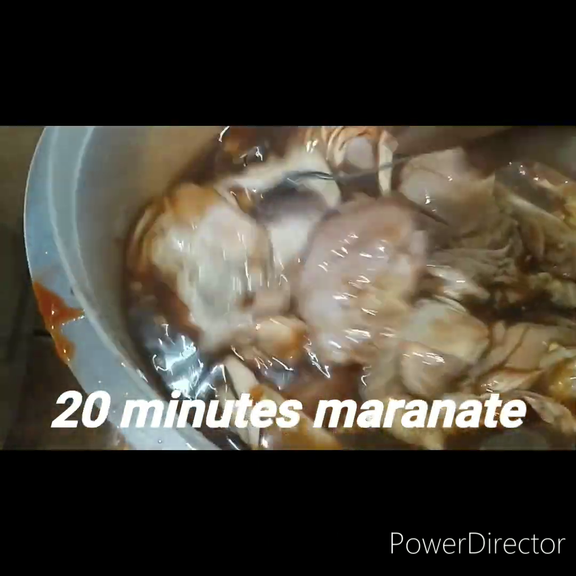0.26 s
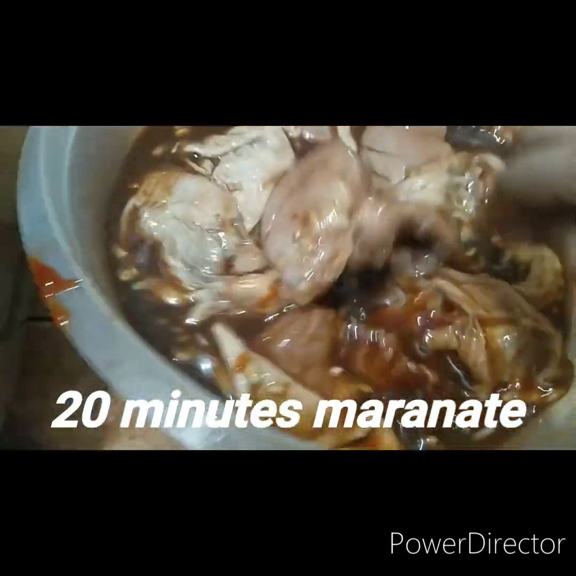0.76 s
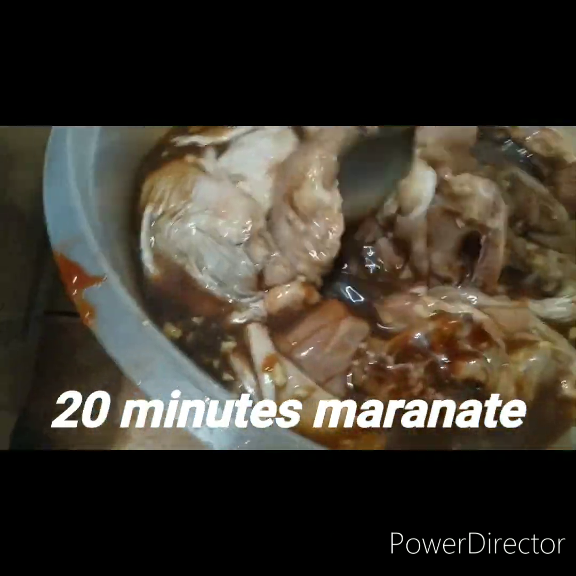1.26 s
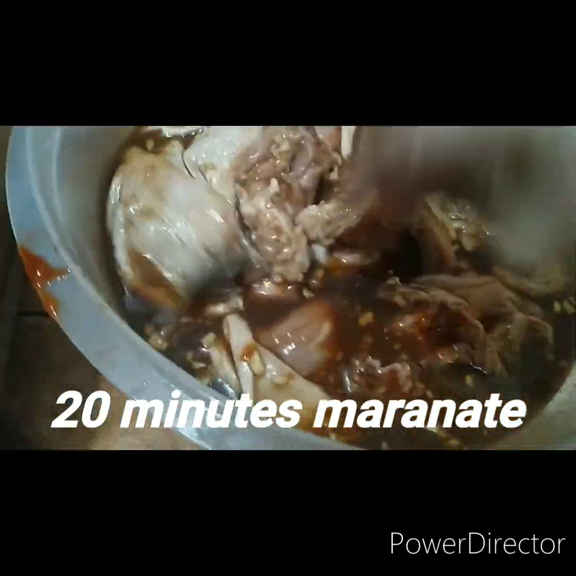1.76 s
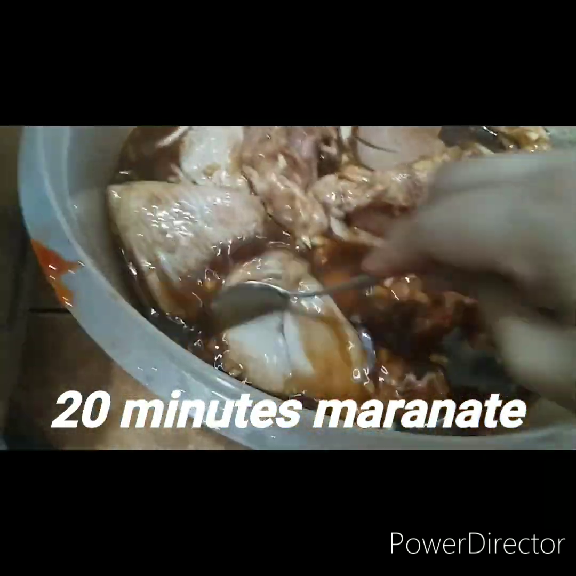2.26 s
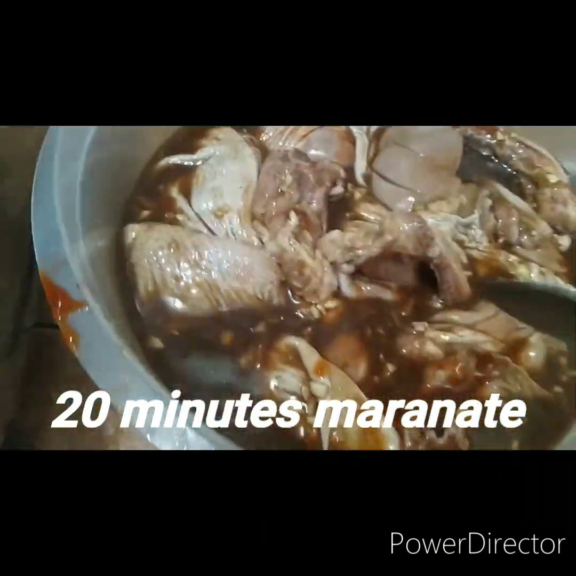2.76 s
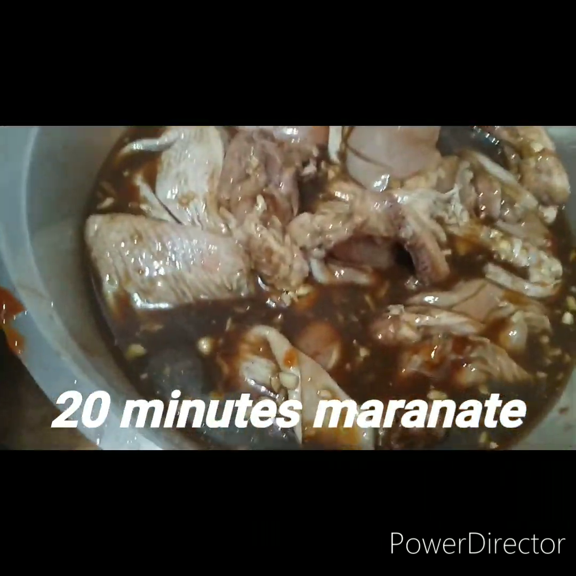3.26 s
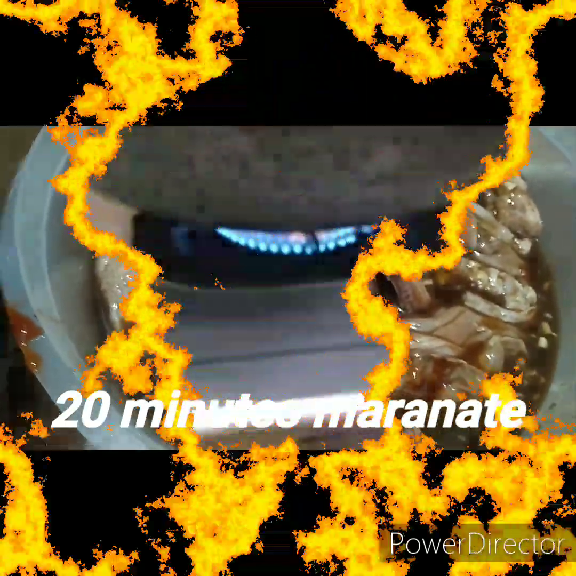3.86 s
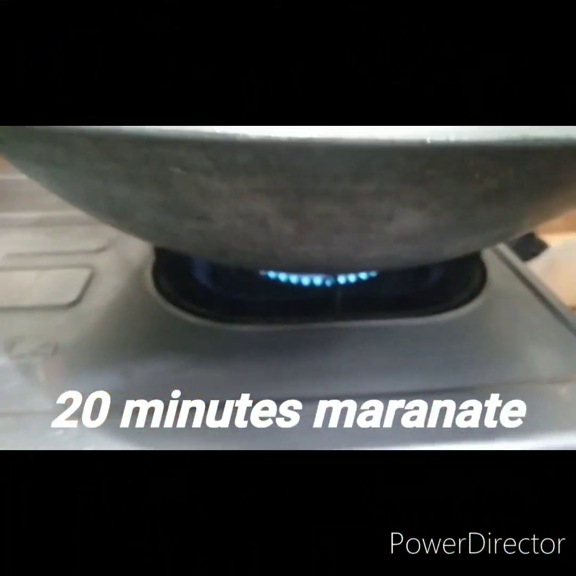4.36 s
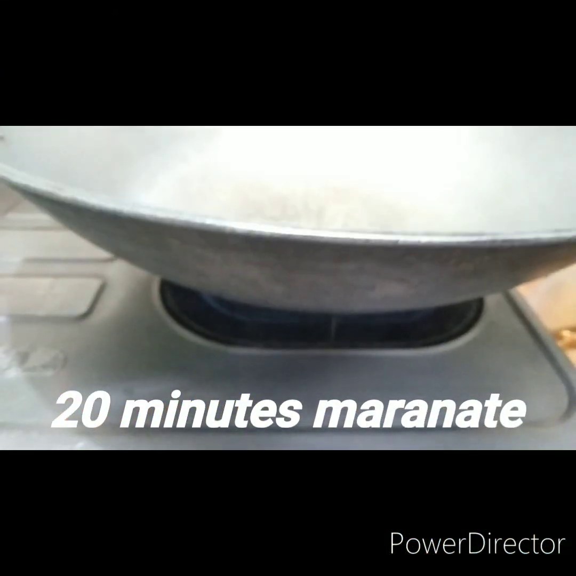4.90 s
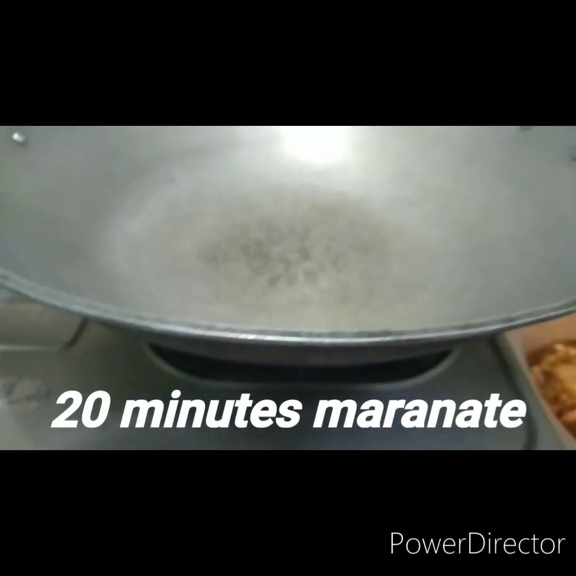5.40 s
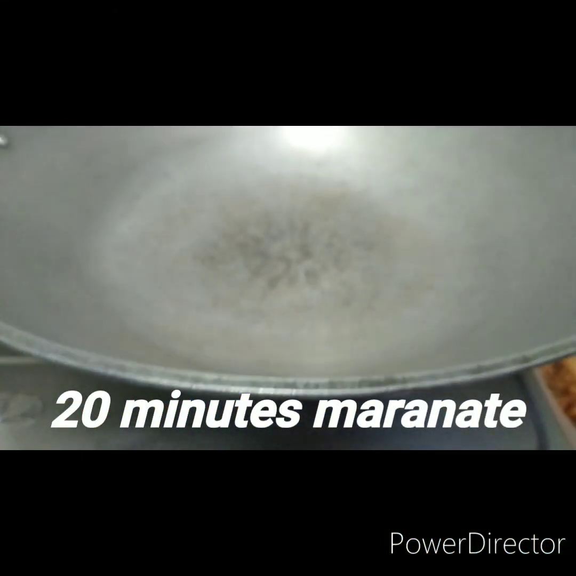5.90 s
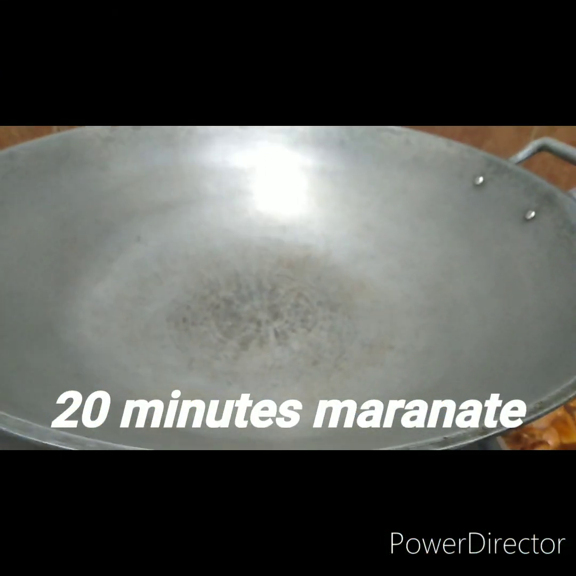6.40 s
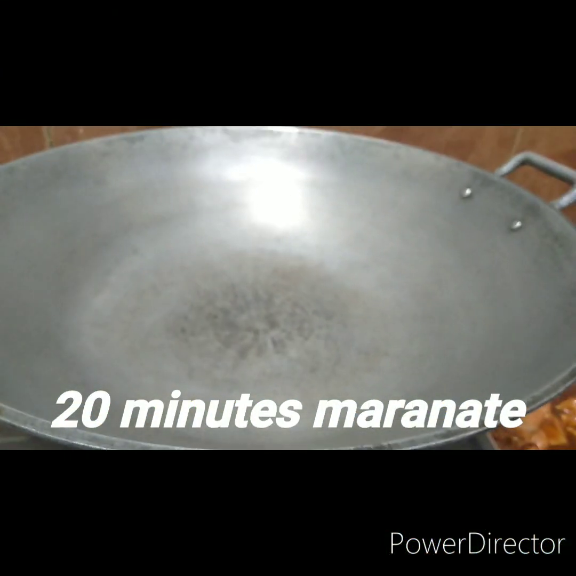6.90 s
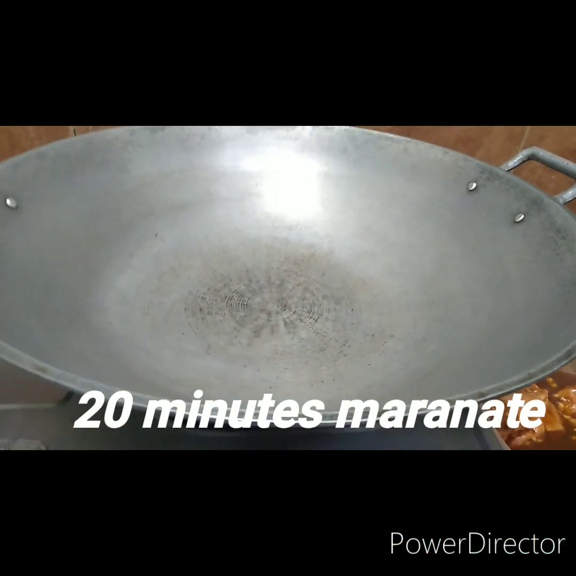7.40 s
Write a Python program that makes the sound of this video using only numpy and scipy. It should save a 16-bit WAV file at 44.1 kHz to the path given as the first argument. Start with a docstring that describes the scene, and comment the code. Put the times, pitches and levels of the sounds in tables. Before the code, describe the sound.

In a faintly humming kitchen, a spoon turns chicken in marinade with a soft wet swish, sticky ticks and thin squeaks, then knocks several times on the plastic bowl. A finger brushes the microphone with a loud, high scratch. After a brief silence, a gas burner fades in with a deep thump and a quiet, steady rush. The stove clunks and an empty wok pings twice.

```python
"""A soft, wet swish: a spoon turns chicken in marinade, with sticky ticks and thin squeaks, in a humming
kitchen. It knocks on the plastic bowl, whose wall rings briefly over a thud from the base. A finger then
brushes the microphone, its friction ringing the port and casing. After a short silence a gas burner
fades in with a deep thump under an empty wok; the stove is bumped and the metal pings twice."""
import sys
import numpy as np
from scipy import signal
from scipy.fft import rfft, irfft, next_fast_len
from scipy.io import wavfile

SR = 44100
rng = np.random.default_rng(int(sys.argv[2]) if len(sys.argv) > 2 else 0)


def persist_wave(psi):
    """Save psi, clipped to +-1, as 16-bit WAV."""
    counts = np.round(np.clip(psi, -1, 1) * 32767).astype(np.int16)
    wavfile.write(sys.argv[1], SR, np.atleast_2d(counts).T)


N = 337365
TIME = np.arange(N) / SR
AGE = TIME[:SR // 2]   # seconds since a hit

# spoon hits, before each layer's trim: t/s, ring level/dB, thud level/dB, crack level/dB, ring centre f/Hz
SPOON_KNOCKS = [(2.196, -20, -46, -32.5, 2110), (2.442, -20, -54, -42, 1750), (2.8, -19, -29, -32, 1160),
                (2.895, -18.5, -31, -42.5, 2090), (2.994, -32, -42.5, -44, 1230)]
# modes of the bowl's wall and of its loaded base: f/Hz, level/dB, t60/s
WALL_MODES = [(506, -13, 0.027), (630, -1.5, 0.017), (792, -2, 0.031), (1010, -8, 0.02), (1175, -7, 0.011),
              (1194, 0.5, 0.031), (1335, 0.5, 0.022), (1600, -4.5, 0.018), (1770, 0.5, 0.021),
              (2060, -1.5, 0.033), (2410, 2, 0.0072), (2464, 0.5, 0.015), (2904, -7, 0.022),
              (3640, -6, 0.019)]
BASE_MODES = [(140, -10, 0.079), (207, -5, 0.054), (344, -2.5, 0.047), (468, 0, 0.027)]
SETTLE_MODES = [(163.7, 0, 0.26), (195.5, 0, 0.16)]
# meat slaps and spoon slips, then meat settling on the base: t/s, level/dB
MEAT_SLAPS = [(.856, -41.5), (2.211, -38), (2.931, -37), (2.944, -34.5), (2.953, -36), (3.323, -43)]
MEAT_SETTLES = [(1.85, -50), (1.888, -49), (2.04, -51.5)]
# stirring effort: t/s, relative level/dB
STIR_EFFORT = [(0.0, -49.5), (0.52, -62), (0.88, -49), (1.44, -60), (1.99, -48), (2.15, -57)]
# colour of the spoon's crack and of the swish: f/Hz, density/dB
CRACK_SPECTRUM = [(600, -5), (2000, 5), (4000, -3.5), (6000, -1), (8500, -6.5), (10000, 2.5), (11000, 9.5),
                  (12500, -2), (15500, -12)]
SWISH_SPECTRUM = [(300, -19), (600, -1), (1100, -1), (2400, -5.5), (5000, -29), (12000, -42)]
# sticky marinade ticks: t/s, level/dB, f/Hz
SAUCE_TICKS = [(0.243, -52, 9600), (0.2768, -55, 11600), (0.4853, -54, 10300), (0.6898, -50, 12300),
               (1.1613, -49, 10500), (1.3992, -54, 13000), (1.5374, -56, 8500)]
# wet spoon squeaks: t/s, length/s, f/Hz, level/dB
SPOON_SQUEAKS = [(0.437, 0.52, 9850, -57.5), (1.89, .32, 4500, -66)]

# finger strokes: t/s, force level/dB, contact length/s, favoured f/Hz, relative hiss level/dB
FINGER_STROKES = [(3.203, -19.5, .005, 12300, -24), (3.346, -12.5, 0.0035, 10200, -22),
                  (3.366, -19.5, 0.041, 11000, -19), (3.665, -33, .003, 9500, -16),
                  (3.679, -23.5, 0.044, 11100, -12.5), (3.746, -32, 0.0045, 9000, -22)]
# rings of the microphone's port and casing: f/Hz, width/Hz, level/dB
PORT_RINGS = [(5100, 44, -10), (8060, 40, -9.5), (9070, 54, -7.5), (9900, 70, -11), (10190, 60, -3),
              (10740, 77, -4.5), (11095, 93, -2.5), (12200, 70, -11), (12500, 73, -6.5), (13850, 65, -16),
              (14800, 80, -15)]
CASING_RINGS = [(1740, 60, -19), (2750, 90, -22), (3780, 52, -21)]
# the finger lands and skips: t/s, level/dB
FINGER_TAPS = [(3.204, -24.5), (3.346, -29), (3.3625, -17.5)]
# presses on the port: t/s
PORT_PRESSES = [3.202, 3.347]
# handling rustles: middle t/s, level/dB, length/s
GRIP_SHIFTS = [(3.593, -49, 0.35), (4.895, -46, 0.044)]
# colour of skin friction, its fine hiss, the taps and the rustles: f/Hz, density/dB
SKIN_SPECTRUM = [(150, -19), (320, -26.5), (550, -11.5), (1600, -3), (2400, -6), (3700, -8.5), (4500, -15),
                 (5400, -12.5), (6600, -19), (8200, -12), (9600, -1), (10800, 6.5), (11700, -6.5),
                 (15400, -9)]
HISS_SPECTRUM = [(11000, -27), (13000, -8), (14300, 2), (15500, -9), (17000, -34.5)]
TAP_SPECTRUM = [(60, -6), (150, 1), (2200, -4.5), (5000, -8), (15000, 0.5)]
RUSTLE_SPECTRUM = [(300, -18), (900, 5), (1500, 2), (3200, -0.5), (6000, -15), (15000, -15)]

# bumps on the stove: t/s, level/dB
STOVE_BUMPS = [(4.528, -33.5), (4.5325, -32), (4.621, -41)]
# wok pings: t/s, level/dB, centre f/Hz, spread/octaves
WOK_PINGS = [(5.3897, -35.5, 3860, 0.39), (5.6922, -25, 2300, 1.8)]
# modes of the stove and the wok: f/Hz, level/dB, t60/s
STOVE_MODES = [(712, 0, 0.044), (776, -1.5, 0.042), (903, 2.5, 0.025), (956, -5.5, 0.052),
               (3300, -9, 0.017)]
WOK_MODES = [(1980, -4, 0.12), (2200, -8, .08), (2125, 0.5, 0.076), (2420, -0.5, 0.16), (2286, 4, 0.079),
             (2453, -1, .09), (2500, -16, .09), (2820, -2, 0.04), (3276, 0.5, 0.078), (3630, -8, 0.12),
             (4692, -7, 0.1), (4970, -15, 0.082), (5590, 0, 0.076), (6860, 1, .06), (6870, 0, 0.066),
             (7600, -18, .08)]
# colour of a ping's noisy edge: f/Hz, density/dB
PING_SPECTRUM = [(1500, 1), (2600, 11), (6000, -2), (9500, -10.0), (13500, 2), (15500, -3.0)]

# burner and room tone, below and above 600 Hz: f/Hz, density/dB
BURNER_LOWS = [(20, -78.5), (65, -88), (92, -73.5), (108, -82), (135, -73.5), (185, -74), (240, -71),
               (300, -71), (380, -79.5), (500, -81.5)]
BURNER_HIGHS = [(700, -80.5), (1500, -80), (2400, -83.5), (3500, -89), (5000, -97), (8000, -104),
                (10000, -102.5), (11300, -99), (12500, -92.5), (13400, -97.5), (13650, -91), (14000, -100),
                (15500, -105)]
ROOM_LOWS = [(20, -74.5), (45, -83.5), (62, -87), (100, -82), (140, -75), (180, -78), (215, -91.5),
             (290, -92), (400, -85.5), (520, -80)]
ROOM_HIGHS = [(750, -81.5), (980, -76.5), (1200, -80.5), (2300, -82.5), (3200, -90), (4500, -95.5),
              (7000, -101), (8800, -100), (10000, -93.5), (11000, -89.5), (12200, -95.5), (14000, -101),
              (15500, -102)]
# motor hum behind the bowl and behind the stove: f/Hz, rms level/dB
HUM_AT_BOWL = [(37.7, -58.5), (75.4, -61.5), (145.3, -62)]
HUM_AT_STOVE = [(45, -58.5), (89, -61), (239, -60), (292, -56)]


def bowl_hits():
    """A spoon knock layers wall ring, base thud and contact crack; the meat lands more softly."""
    out, crack = np.zeros(N), noise(CRACK_SPECTRUM)
    for s, ring_db, thud_db, crack_db, centre_hz in SPOON_KNOCKS:
        add(out, s, ring_db - 5, struck(WALL_MODES, uneven_db=1.5, centre_hz=centre_hz, octaves=0.94))
        add(out, s + 0.00091, thud_db - 0.5, struck(BASE_MODES, uneven_db=0.5))
        add(out, s, crack_db + 6, burst(crack, s, t60=0.022))
    for s, db in MEAT_SLAPS:
        add(out, s, db, struck(WALL_MODES, uneven_db=2.5, centre_hz=1400, octaves=0.38))
    for s, db in MEAT_SETTLES:   # soft and heavy: only the lowest modes swell up
        add(out, s, db, struck(SETTLE_MODES, uneven_db=3.0) * (1 - decay(0.015)))
    return kitchen_reverb(out, wet_db=-7.5, dull_hz=8050)


def stirring():
    """Meat dragged through sauce gives a grainy swish that follows the effort."""
    times, db = np.transpose(STIR_EFFORT)
    effort = np.interp(TIME, times, from_db(db), right=0)
    grain = from_db(3.6 * drift(120))
    return from_db(-3.5) * effort * grain * unit_rms(noise(SWISH_SPECTRUM))


def marinade(tick_width_hz=1900, wander_hz=69.7):
    """Films of sauce snap, each at its own pitch; the wet spoon squeaks in a narrow, wavering band."""
    out, snap = np.zeros(N), rng.standard_normal(N)
    for s, db, hz in SAUCE_TICKS:
        film = resonate(burst(snap, s, t60=0.018), hz, tick_width_hz)
        add(out, s, db, resonate(film, hz, tick_width_hz))
    for s, length, hz, db in SPOON_SQUEAKS:
        phase = 2 * np.pi * np.cumsum(hz + wander_hz * drift(14)) / SR
        envelope = from_db(db) * swell(s, length, edge_s=0.11)
        out += envelope * (drift(400) * np.sin(phase) + drift(400) * np.cos(phase))
    return out


def finger(rise_share=0.46, release_t60_s=0.16):
    """Skin taps, sticks and slips on the microphone; the grainy friction rings its port and casing."""
    out = np.zeros(N)
    rub, grain = unit_rms(noise(SKIN_SPECTRUM)), unit_rms(from_db(1.3 * drift(500)))
    hiss = unit_rms(noise(HISS_SPECTRUM))
    for s, db, length, favoured_hz, hiss_db in FINGER_STROKES:
        span = slice(int(s * SR), int(s * SR) + len(AGE))
        attack = np.clip(AGE / (rise_share * length), 0, 1)
        release_db = -60 * np.maximum(AGE - length, 0) / release_t60_s
        force = grain[span] * attack * from_db(db + release_db)
        slips = force * rng.standard_normal(len(AGE))
        # the place of the finger decides which rings speak most
        port = sum(from_db(ring_db - min(abs(hz - favoured_hz) / 100, 7)) * resonate(slips, hz, width)
                   for hz, width, ring_db in PORT_RINGS)
        casing = sum(from_db(ring_db) * resonate(slips, hz, width) for hz, width, ring_db in CASING_RINGS)
        friction = force * (from_db(-3.5) * rub[span] + from_db(hiss_db) * hiss[span])
        out[span] += friction + from_db(-4) * port + casing
    tap = noise(TAP_SPECTRUM)
    for s, db in FINGER_TAPS:
        add(out, s, db, burst(tap, s, t60=0.018))
    return out


def port_pops(rebound_share=0.48):
    """Each press on the port pulls the pressure down; it rebounds, weaker and longer."""
    return from_db(-24.5) * sum(rebound_share * puff(s + 0.034, length_s=0.11) - puff(s, length_s=0.047)
                                for s in PORT_PRESSES)


def stove_and_wok():
    """The bumped stove clunks with a soft attack; the wok's metal pings with a bright, noisy edge."""
    out, edge = np.zeros(N), noise(PING_SPECTRUM)
    for s, db in STOVE_BUMPS:
        add(out, s, db, struck(STOVE_MODES, uneven_db=1.0) * (1 - decay(0.004)))
    for s, db, centre_hz, octaves in WOK_PINGS:
        add(out, s, db, struck(WOK_MODES, uneven_db=1.5, centre_hz=centre_hz, octaves=octaves))
        add(out, s, db - 7, burst(edge, s, t60=0.15))
    return kitchen_reverb(out, wet_db=-6.0, dull_hz=9000)


def deep_thump():
    """One slow push of air as the burner fades in."""
    return from_db(-31.7) * puff(4.035, length_s=0.26)


def rustles():
    """Short grainy swells as the hand shifts its grip."""
    grip = sum(from_db(db) * swell(s - length / 2, length, length / 2) for s, db, length in GRIP_SHIFTS)
    grain = from_db(3.3 * drift(300))
    return grip * grain * unit_rms(noise(RUSTLE_SPECTRUM))


def burner():
    """The gas flame is a steady rush with a slight flutter."""
    return noise(BURNER_LOWS + BURNER_HIGHS) * from_db(-0.39 + 0.5 * drift(25))


def room_tone():
    """A faint, gently wavering bed of kitchen air."""
    return noise(ROOM_LOWS + ROOM_HIGHS) * from_db(-1.36 + 0.5 * drift(9.16))


def motor_hum(partials, waver_rad):
    """Low motor tones that waver in phase."""
    return sum(from_db(db) * np.sqrt(2) * np.sin(2 * np.pi * hz * TIME + waver_rad * drift(7))
               for hz, db in partials)


def kitchen_reverb(x, wet_db, dull_hz, t60=0.15):
    """Direct sound and a short, duller wash of reflections."""
    tail = rng.standard_normal(len(AGE)) * decay(t60) * (AGE > 0.004)
    tail = signal.sosfilt(signal.butter(1, dull_hz, fs=SR, output="sos"), tail / np.linalg.norm(tail))
    return x + from_db(wet_db) * signal.fftconvolve(x, tail)[:N]


def struck(modes, uneven_db, centre_hz=1000, octaves=np.inf):
    """Modes rung by one blow; the spot that is hit favours those near a centre pitch."""
    out = 0
    for hz, db, t60 in modes:
        favour = np.exp(-0.5 * (np.log2(hz / centre_hz) / octaves) ** 2)
        strength = favour * from_db(db + uneven_db * rng.standard_normal())
        out = out + strength * decay(t60) * np.sin(2 * np.pi * (hz * AGE + rng.random()))
    return out


def resonate(x, hz, width_hz):
    """A resonance that keeps the power of white noise."""
    r = np.exp(-np.pi * width_hz / SR)
    feedforward = np.sqrt((1 - r * r) / 2) * np.array([1, 0, -1])
    feedback = [1, -2 * r * np.cos(2 * np.pi * hz / SR), r * r]
    return signal.lfilter(feedforward, feedback, x + 1e-18)


def noise(spectrum):
    """Noise with the given dB per Hz."""
    hz, db = np.transpose(spectrum)
    size = next_fast_len(N)
    bins_hz = np.arange(size // 2 + 1) * SR / size
    gain = from_db(np.interp(np.log(bins_hz + 1), np.log(hz), db))
    return irfft(rfft(rng.standard_normal(size)) * gain, size)[:N] * np.sqrt(SR / 2)


def drift(per_s):
    """Random modulation with rms 1."""
    knots = rng.standard_normal(N // 8)
    return unit_rms(np.interp(TIME * per_s, np.arange(len(knots)), knots))


def decay(t60):
    """Half a second of exponential decay."""
    return from_db(-60 * AGE / t60)


def burst(source, s, t60):
    """A quickly dying slice of noise."""
    return source[int(s * SR):][:len(AGE)] * decay(t60)


def swell(s, length, edge_s):
    """An envelope that eases in, holds and eases out."""
    return np.sin(np.pi / 2 * np.clip(np.minimum(TIME - s, s + length - TIME) / edge_s, 0, 1))


def puff(s, length_s):
    """One push of air, quick to come and slower to go."""
    return np.sin(np.pi * np.clip((TIME - s) / length_s, 0, 1) ** 0.58) ** 2


def add(track, s, db, sound):
    """Place a hit so that its first 7 ms have the given rms level."""
    at, head = int(s * SR), sound[:int(0.007 * SR)]
    track[at:at + len(sound)] += from_db(db) * sound[:N - at] / np.sqrt(np.mean(head ** 2))


def from_db(db):
    """Decibels to gain."""
    return 10 ** (np.asarray(db) / 20)


def unit_rms(x):
    """Scale to rms 1."""
    return x / np.sqrt(np.mean(x ** 2) + 1e-20)


def scene(cut_s=3.906, resume_s=3.955, fade_s=0.18):
    """First the bowl, a silent gap, then the burner fades in."""
    bowl_bed = room_tone() + motor_hum(HUM_AT_BOWL, waver_rad=0.14)
    stove_bed = burner() + motor_hum(HUM_AT_STOVE, waver_rad=0.84)
    at_bowl = bowl_bed + stirring() + bowl_hits() + marinade() + finger()
    at_stove = stove_bed + stove_and_wok()
    fade_in = np.interp(TIME, [resume_s, resume_s + fade_s], [0.12, 1], left=0)
    return (at_bowl * (TIME < cut_s) + at_stove * fade_in + rustles() + port_pops() + deep_thump())[None]


def gain_control(x, threshold_db, slope, release_db_per_s, window_s):
    """Loud sounds duck the gain; it creeps back up afterwards."""
    r = np.exp(-1 / (window_s * SR))
    level_db = 10 * np.log10(signal.lfilter([1 - r], [1, -r], x ** 2) + 1e-12)
    over_db = np.maximum(level_db - threshold_db, 0)
    recovery_db = release_db_per_s * TIME
    duck_db = np.maximum.accumulate(slope * over_db + recovery_db, axis=-1) - recovery_db
    return x * from_db(-duck_db)


def record(dry):
    """Automatic gain, then a steep top cut."""
    held = gain_control(dry, threshold_db=-31.5, slope=0.5, release_db_per_s=23.5, window_s=0.014)
    return signal.fftconvolve(held, signal.firwin(401, cutoff=15550, fs=SR)[None], "same")


dry = scene()
out = record(dry)
persist_wave(out)
```